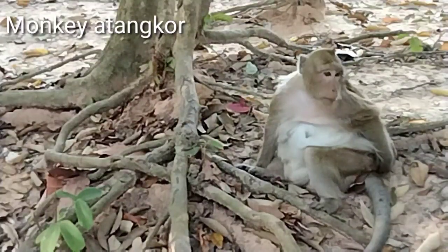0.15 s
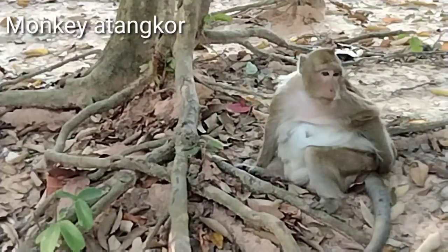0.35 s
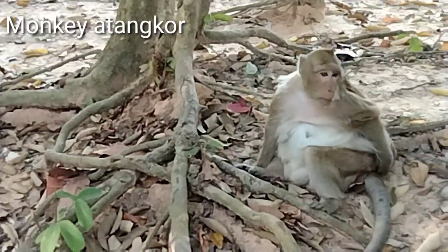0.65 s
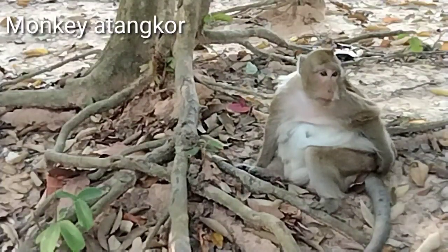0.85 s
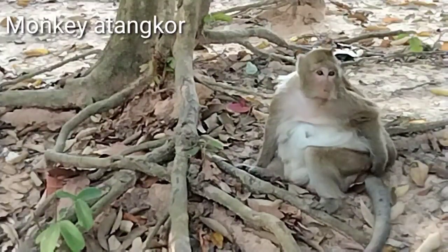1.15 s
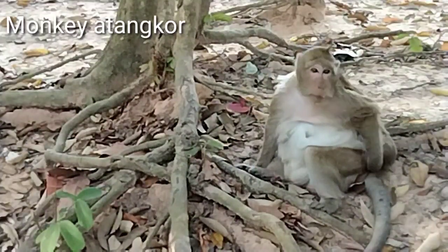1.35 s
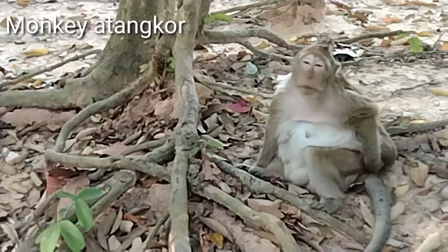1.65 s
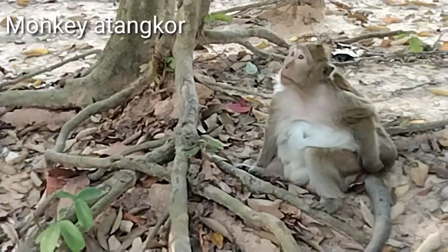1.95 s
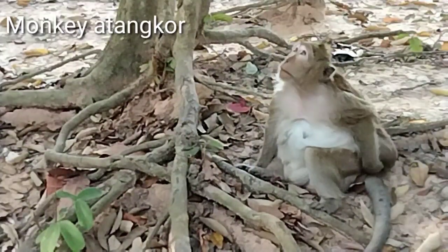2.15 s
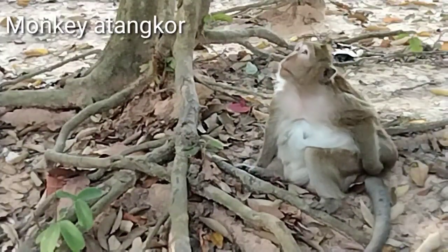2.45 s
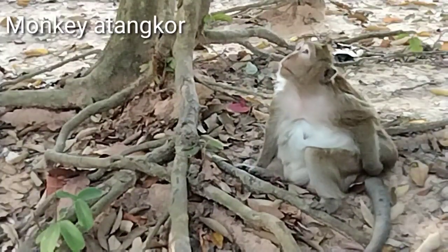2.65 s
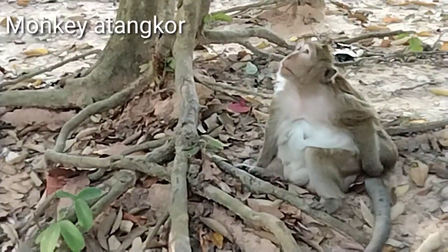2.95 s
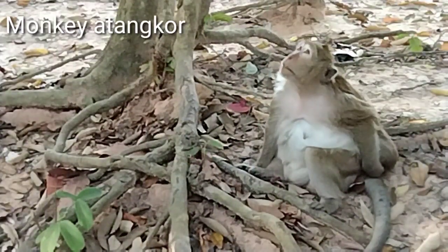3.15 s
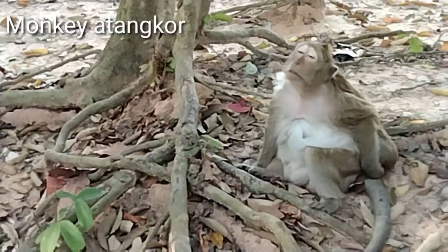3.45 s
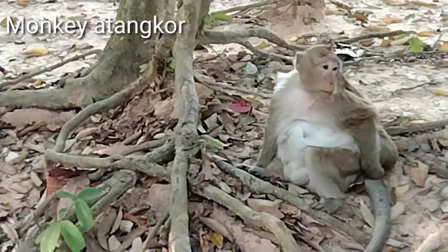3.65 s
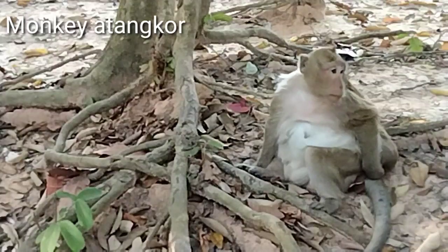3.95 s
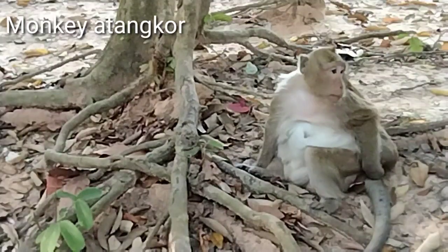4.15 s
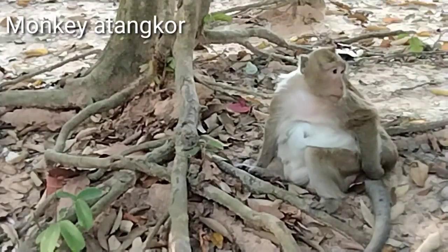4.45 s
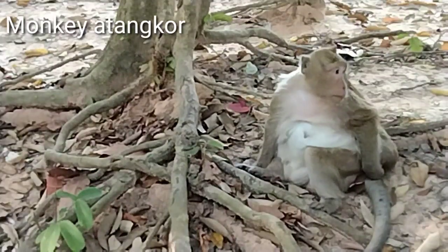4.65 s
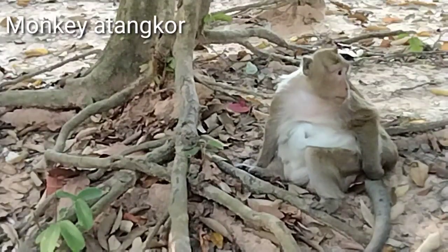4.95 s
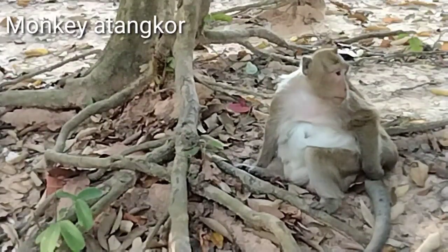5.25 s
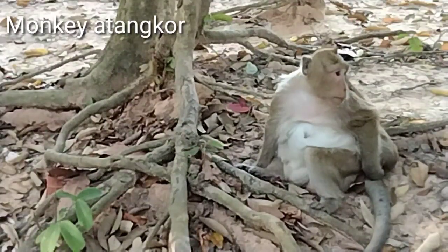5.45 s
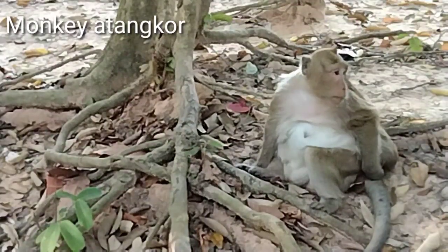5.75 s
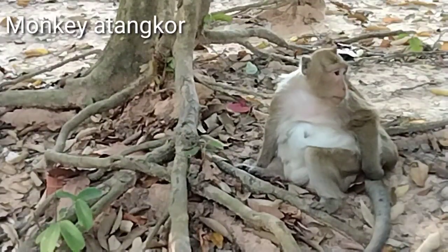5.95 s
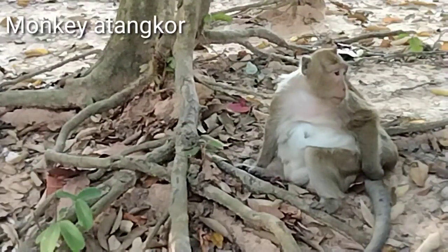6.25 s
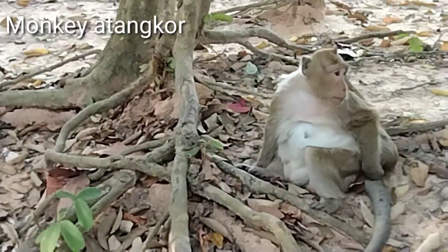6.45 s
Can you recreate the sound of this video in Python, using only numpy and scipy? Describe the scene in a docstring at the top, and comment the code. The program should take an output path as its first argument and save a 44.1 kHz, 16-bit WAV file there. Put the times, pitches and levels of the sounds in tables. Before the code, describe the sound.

A distant engine throbs under a dull rush of air and faint bird whistles, then fingers click, rub and squeak on the microphone.

```python
"""A slow engine throbs far off behind trees, each firing thumping its pipe, over a dull rush of air.
A distant bird gives two rising whistles that linger among the trunks; small dry ticks come and go.
Then, right at the microphone, fingers shift on the camera: tips thud, skin sticks and slips in
rasps and squeaks, and the plastic case clicks and rings. A thin high hiss comes up at the end."""
import sys
import numpy as np
from scipy import signal
from scipy.fft import rfft, irfft, next_fast_len
from scipy.io import wavfile
from scipy.ndimage import uniform_filter1d, map_coordinates

SR = 44100
rng = np.random.default_rng(int(sys.argv[2]) if len(sys.argv) > 2 else 0)


def persist_wave(psi):
    """Save psi, clipped to +-1, as 16-bit WAV."""
    counts = np.round(np.clip(psi, -1, 1) * 32767).astype(np.int16)
    wavfile.write(sys.argv[1], SR, np.atleast_2d(counts).T)


N = 290619


def amp(db):
    """Decibels to gain."""
    return 10 ** (np.asarray(db) / 20)


def unit(x):
    """Scale to rms 1."""
    return x / np.sqrt(np.mean(x ** 2) + 1e-20)


def along(points, hz):
    """Read (frequency, value) points at hz, on a log axis."""
    freqs, values = np.transpose(points)
    return np.interp(np.log(hz + 1), np.log(freqs + 1), values)


def curves(rows):
    """One value per sample for each column after the time."""
    times, *columns = np.transpose(rows)
    return [np.interp(np.arange(N) / SR, times, column) for column in columns]


def wobble(rate):
    """A smooth random curve, rate knots a second."""
    return map_coordinates(rng.standard_normal(int(N * rate / SR) + 4), [np.arange(N) * rate / SR])


def filtered(x, response):
    """Shape x by a gain that depends on frequency."""
    size = next_fast_len(N + SR // 2)
    return irfft(rfft(x, size) * response(np.fft.rfftfreq(size, 1 / SR)), size)[:N]


def noise(spectrum, grain=1):
    """Noise of rms 1 with a given spectrum, optionally broken into grains."""
    return unit(filtered(grain * rng.standard_normal(N), lambda hz: amp(along(spectrum, hz))))


def patchy(x, depth_db):
    """Give x brief random swells in narrow bands, at rms 1."""
    bands = signal.stft(x, nperseg=512)[2]
    swells = uniform_filter1d(rng.standard_normal(bands.shape), size=7, axis=0)
    swells = unit(uniform_filter1d(swells, size=5, axis=1))
    return unit(signal.istft(bands * amp(depth_db * swells), nperseg=512)[1][:N])


def phase_of(hz):
    """Running phase of a changing frequency."""
    return 2 * np.pi * np.cumsum(hz) / SR


def add(track, start, sound):
    """Mix a sound into a track at start seconds."""
    part = track[round(start * SR):][:len(sound)]
    part += sound[:len(part)]


def notes(rows, waver_hz):
    """Short, soft-edged notes, each on one wavering pitch."""
    track = np.zeros(N)
    for start, length, hz, db in rows:
        swell = np.hanning(int(length * SR))
        pitch = hz + waver_hz * wobble(220)[:len(swell)]
        add(track, start, amp(db) * swell * np.sin(phase_of(pitch)))
    return track


# Outdoor air, with a peak from the microphone port: (frequency [Hz], relative density [dB])
AIR_SPECTRUM = [(20, -25), (32, -14), (42, -2), (52, -3.5), (80, 11), (115, 12.5), (170, 13), (300, -6),
                (520, -0.5), (750, -2), (1050, -9.5), (1300, -2), (1540, 5.5), (1720, -2), (1950, -7),
                (2150, -10.5), (2400, -34), (4000, -45.5), (15000, -50)]
# Its strength at the microphone: (time [s], level [dB])
AIR_LEVEL = [(0, -51.5), (1, -52), (2.5, -53), (3.6, -52), (4.5, -51), (5.4, -51), (6.59, -51)]
def air():
    """The air of the wood, all around: a dull steady rush over a low rumble."""
    return amp(curves(AIR_LEVEL)[0]) * patchy(noise(AIR_SPECTRUM), depth_db=0.96)


# Colour of the hiss: (frequency [Hz], relative density [dB])
HISS_SPECTRUM = [(2300, 1), (2650, -12), (3100, 2), (3900, -24), (5000, -27.5), (6100, -18), (6900, 4),
                 (7400, 5), (8000, 1.5), (8700, -3), (10100, -19), (12000, -12), (15500, -12)]
# Its late rise: (time [s], level [dB])
HISS_LEVEL = [(5.6, -105), (5.85, -72), (6.02, -67.5), (6.25, -65.5), (6.59, -64.5)]
def hiss():
    """A thin, flickering hiss comes up in the background."""
    return amp(curves(HISS_LEVEL)[0]) * patchy(noise(HISS_SPECTRUM), depth_db=4.5)


# Shrill bands: (centre [Hz], width [Hz], relative level [dB])
INSECT_BANDS = [(3090, 240, -3), (7360, 430, -1.5)]
# Their shared swell: (time [s], level [dB])
INSECT_LEVEL = [(5.0, -130), (5.4, -77.5), (5.65, -82.5), (5.85, -73), (6.59, -76)]
def insects():
    """Two narrow, insect-like bands of noise come up just ahead of the hiss."""
    shrill = np.zeros(N)
    for centre, width, db in INSECT_BANDS:
        band = filtered(rng.standard_normal(N), lambda hz: 1 / (1 + ((hz - centre) / width) ** 2) ** 3)
        shrill += amp(db) * unit(band)
    return amp(curves(INSECT_LEVEL)[0]) * shrill


# Engine speed: (time [s], firing rate [Hz])
FIRING_RATE = [(0, 28.65), (.6, 28.7), (1.5, 28.6), (2.3, 28.4), (2.8, 28.55), (3.1, 29.1), (3.9, 29.1),
               (4.6, 28.95), (5.2, 29.1), (6, 28.85), (6.59, 28.45)]
# The droning fifth exhaust harmonic: (time [s], level [dB])
DRONE_LEVEL = [(0.0, -45.5), (0.38, -48), (1.01, -60), (1.19, -73), (1.25, -54), (1.71, -49), (2.02, -56),
               (5.69, -59.5), (6.31, -50), (6.59, -55)]
# The booming sixth: (time [s], level [dB])
BOOM_LEVEL = [(0.0, -43), (0.07, -46.5), (0.27, -52.5), (0.37, -42), (0.44, -48), (0.66, -41),
              (1.05, -45.5), (1.35, -52), (1.72, -59.5), (1.91, -44.5), (2.15, -57.5), (2.37, -46),
              (2.5, -61.5), (2.66, -44.5), (2.83, -53), (2.99, -46.5), (3.12, -64.5), (3.25, -48),
              (3.38, -57), (5.05, -55.5), (5.17, -61.5), (5.51, -50.5), (5.58, -60), (6.59, -52.5)]
# The other harmonics: (multiple of the firing rate, start level [dB], end level [dB])
EXHAUST_HARMONICS = [(3, -69.5, -64), (4, -64, -61), (7, -56, -63.5), (8, -62.5, -68), (9, -62, -70),
                     (10, -68.5, -72.5), (11, -68.5, -72), (12, -66, -76.5), (13, -66.5, -78.5),
                     (14, -72, -80.5)]
# The roar, dull with distance: (frequency [Hz], relative density [dB])
ROAR_SPECTRUM = [(50, -40.5), (95, -12), (135, 0), (175, 2), (215, -1), (265, 1), (310, -4.5), (430, -13),
                 (700, -19), (950, -10.5), (1200, -15), (1600, -57), (2600, -110)]
# How much of the roar gets through the trees: (time [s], relative level [dB])
ROAR_TREND = [(0, -45.5), (.4, -48), (.85, -49), (1.4, -49.5), (2.6, -51.5), (3.7, -54), (6.59, -57)]
def engine(first_firing_s=0.017, pipe_hz=160, pipe_width_hz=50, drone_db=-0.5, roar_db=-56,
           throb=0.27, fading_db=3.0, scatter_rad=0.72, uneven_db=0.94):
    """Far off, each firing thumps the pipe and swells the roar; harmonics waver through the trees."""
    rate, = curves(FIRING_RATE)
    firing_phase = phase_of(rate) - 2 * np.pi * rate[0] * first_firing_s
    harmonics = [(5, curves(DRONE_LEVEL)[0] + drone_db), (6, curves(BOOM_LEVEL)[0])]
    for k, start_db, end_db in EXHAUST_HARMONICS:
        harmonics.append((k, np.linspace(start_db, end_db, N) + fading_db * wobble(2.2)))
    thumps = np.zeros(N)
    for k, db in harmonics:
        pipe_lag = np.arctan(2 * (k * rate - pipe_hz) / pipe_width_hz)
        thumps += amp(db) * unit(np.cos(k * firing_phase - pipe_lag + scatter_rad * wobble(2.7)))
    roar = unit(noise(ROAR_SPECTRUM) * np.exp(throb * np.cos(firing_phase - np.pi / 3)))
    thumps *= amp(uneven_db * wobble(28))  # no two firings are quite equal
    trend_db, = curves(ROAR_TREND)
    return thumps + amp(roar_db + trend_db - trend_db.mean()) * roar


# How long the wood rings: (frequency [Hz], t60 [s])
FOREST_DECAY = [(500, .55), (3000, .33), (5300, .55), (7000, .33), (14000, .3)]
def forest(x, build_s=0.0039):
    """Trunks and leaves scatter a sound into a smooth tail that builds up as more of them answer."""
    hz, t, bands = signal.stft(rng.standard_normal(SR), SR, nperseg=256)
    envelope = amp(-60 * t / along(FOREST_DECAY, hz)[:, None]) * (1 - np.exp(-t / build_s))
    tail = signal.istft(bands * envelope, SR, nperseg=256)[1]
    return signal.fftconvolve(x, tail / np.linalg.norm(tail))[:N]


# Faint calls: (time [s], length [s], pitch [Hz], level [dB])
PEEPS = [(0.042, 0.058, 2780, -82.5), (0.622, 0.082, 5340, -85), (2.096, 0.068, 3900, -87),
         (2.3, 0.023, 3980, -68), (3.055, 0.045, 3830, -85), (5.55, 0.17, 5400, -81)]
def far_birds():
    """Birds deep in the wood peep, each call on one pitch."""
    return notes(PEEPS, waver_hz=35)


# Ticks and scrapes: (time [s], peak [dB], pitch [Hz], t60 [s], crack against ring [dB])
DRY_TICKS = [(2.179, -63.5, 3160, .014, -9), (2.46, -56, 2370, 0.024, -29), (3.1838, -40, 1600, 0.006, -45),
             (3.203, -30.5, 1550, 0.0042, -11.5), (3.846, -35, 1550, 0.0052, -6),
             (3.948, -51, 3980, 0.025, -8), (3.984, -54.5, 3760, .02, -3), (4.019, -51, 3980, .05, -3),
             (5.529, -54, 4370, 0.0063, -14), (5.833, -35.5, 1850, 0.022, -32.5)]
def dry_ticks(attack_s=0.00067, crack_hz=4400):
    """Small dry ticks and soft scrapes, each a brief ring under a tiny crack."""
    track, t = np.zeros(N), np.arange(SR // 20) / SR
    crack_band = signal.butter(6, [crack_hz / 2, crack_hz], "band", fs=SR)
    for start, db, hz, t60, crack_db in DRY_TICKS:
        crack = unit(signal.lfilter(*crack_band, rng.standard_normal(len(t))))
        envelope = amp(-60 * t / t60) * (1 - np.exp(-t / attack_s)) ** 2
        tick = envelope * (np.sin(2 * np.pi * hz * t) + amp(crack_db) * crack)
        add(track, start, amp(db) * tick / np.abs(tick).max())
    return track


# Rising whistles: (time [s], length [s], level [dB], starting pitch [Hz])
WHISTLES = [(2.333, 0.12, -60.5, 4240), (3.335, .155, -63, 4180)]
def whistling_bird(top_hz=6600, waver_hz=90, edge_s=0.0028, peak_at=0.38, onset_db=-20, ending_db=-12):
    """A distant bird whistles in trembling upward glides, each loudest a little before its middle."""
    song = np.zeros(N)
    for start, length, db, from_hz in WHISTLES:
        progress = np.linspace(0, 1, int(length * SR))
        hz = from_hz * (top_hz / from_hz) ** progress + waver_hz * wobble(220)[:len(progress)]
        rise_db = onset_db * (1 - progress / peak_at) ** 2
        fall_db = ending_db * ((progress - peak_at) / (1 - peak_at)) ** 2
        arch_db = np.where(progress < peak_at, rise_db, fall_db)
        edges = np.minimum(np.minimum(progress, 1 - progress) * length / edge_s, 1)
        add(song, start, edges * amp(db + arch_db) * np.sin(phase_of(hz)))
    return song


# Crackle of the resting hand: (frequency [Hz], relative density [dB])
CREEP_SPECTRUM = [(300, -12.5), (1500, 1.5), (2300, 11), (3000, -1.5), (4100, -1.5), (5500, -8.5),
                  (7500, -2.5), (10000, -15.5), (15500, -19.5)]
# Its strength at the microphone: (time [s], level [dB])
GRIP_LEVEL = [(3.845, -115), (3.855, -69), (3.93, -72.5), (4.02, -68.5), (4.1, -67.5), (4.4, -64),
              (5.0, -59.5), (5.27, -62.5), (5.38, -66), (5.55, -100)]
def grip(uneven_db=4):
    """Beside the microphone, the resting hand creeps on the case with a faint, fine crackle."""
    grain = amp(uneven_db * np.minimum(wobble(240), 2.5))
    return amp(curves(GRIP_LEVEL)[0]) * noise(CREEP_SPECTRUM, grain)


# Fingertip landings: (time [s], relative peak [dB])
THUDS = [(4.077, -40), (4.101, -31.5), (4.2155, -38), (4.361, -42.5), (4.4096, -35), (4.5876, -32.5),
         (4.925, -30.5), (5.0415, -39.5), (5.832, -40)]
def thuds(push_s=0.00064, gain_db=7, low_cut_hz=100):
    """A fingertip lands by the microphone: one soft push of pressure, no ring, little deep bass."""
    track, u = np.zeros(N), np.arange(SR // 30) / SR / push_s
    pulse = u * (1 - u / 2) * np.exp(-u)
    for start, db in THUDS:
        add(track, start, amp(db + gain_db) * pulse / pulse.max())
    return signal.lfilter(*signal.butter(2, low_cut_hz, "high", fs=SR), track)


# Clean squeaks: (time [s], length [s], pitch [Hz], level [dB])
SQUEAKS = [(4.236, 0.03, 11300, -49), (4.322, 0.033, 7300, -49), (4.425, 0.032, 11100, -44),
           (4.537, 0.02, 7150, -44.5), (4.644, .01, 6560, -39), (4.684, 0.019, 5200, -46),
           (4.738, 0.033, 5400, -45), (4.843, 0.019, 6000, -34)]
def squeaks():
    """Close up, a finger squeaks briefly as it catches or lets go."""
    return notes(SQUEAKS, waver_hz=70)


def chatter(pitch, spread_hz, slips_per_s=800, t60=0.017, uneven_db=3.0):
    """Stick and slip: an uneven train of tiny pings, each with its own size and pitch; rms 1 in all."""
    count = int(slips_per_s * N / SR)
    jitter, detune, size = rng.standard_normal((count, 3)).T
    onsets = np.clip((np.arange(count) + jitter / 2) * SR / slips_per_s, 0, N - 1).astype(int)
    hz = pitch[onsets] + spread_hz[onsets] * np.clip(detune, -1.5, 1.5)
    n = np.arange(SR // 60)
    envelopes = amp(uneven_db * np.minimum(size[:, None], 2) - 60 * n / SR / t60)
    pings = envelopes * np.sin(2 * np.pi * hz[:, None] * n / SR)
    return unit(np.bincount((onsets[:, None] + n).ravel(), pings.ravel(), N)[:N])


def stroke_envelope(start, length, start_db, end_db, rise_db_per_s=1252, fall_db_per_s=897):
    """Level of one finger stroke in dB: a quick rise, a ramp while it slides, a quick fall."""
    t = np.arange(N) / SR - start
    ramp_db = np.interp(t, [0, length], [start_db, end_db])
    return ramp_db + rise_db_per_s * np.minimum(t, 0) - fall_db_per_s * np.maximum(t - length, 0)


# Finger strokes: (time [s], length [s], start level [dB], end level [dB],
# squeak start [Hz], squeak end [Hz], squeak spread [Hz], relative body level [dB])
STROKES = [(4.066, 0.082, -55.5, -57, 8350, 9400, 1500, -8),
           (4.234, 0.017, -52.5, -50, 8300, 8200, 1180, 0.5),
           (4.265, 0.055, -33, -39.5, 7240, 7700, 520, -8.5),
           (4.431, 0.072, -37.5, -46, 7090, 6930, 399, -11.5),
           (4.547, 0.054, -49, -47, 6580, 6200, 299, -5), (4.622, 0.038, -48, -49.5, 6300, 6800, 393, 0.5),
           (4.684, 0.016, -36.5, -38, 6650, 6140, 700, -12),
           (4.713, 0.027, -40.5, -32, 6600, 6200, 450, -12.5),
           (4.862, 0.036, -35, -25.5, 6960, 5870, 1050, -13),
           (5.017, 0.0097, -62, -57, 4240, 4200, 697, -6), (5.223, 0.0046, -44, -48, 7100, 6970, 248, -3)]
# Skin rasping on plastic: (frequency [Hz], relative density [dB])
RASP_SPECTRUM = [(200, -16), (450, -6), (900, -8.5), (1200, -11), (1550, -3.5), (2000, 1), (2600, -17),
                 (3200, -10), (4000, 0.5), (4900, -13.5), (6500, -1.5), (7700, 0.5), (9300, -17),
                 (11400, -7.5), (15500, -8.5)]
# The hollow body of the case: (frequency [Hz], relative density [dB])
BODY_SPECTRUM = [(700, -34), (1200, -6), (1530, 4.5), (1950, -13), (2600, -31.5), (5000, -57.5)]
def rubbing(rasp_db=-4, squeak_db=-1, octave_db=-13, grain_db=2.5, crackle_db=-58, slip_db=9):
    """Skin drags by the microphone in fine slips: a grainy rasp, a hollow body, a gliding squeak."""
    knots, envelopes = [], []
    for start, length, start_db, end_db, from_hz, to_hz, *timbre in STROKES:
        knots += [(start, from_hz, *timbre), (start + length, to_hz, *timbre)]
        envelopes.append(stroke_envelope(start, length, start_db, end_db))
    pitch, spread_hz, body_db = curves(sorted(knots))
    stroke_db = np.max(envelopes, axis=0)
    grain = amp(grain_db * np.minimum(wobble(900), 2))
    rasp = patchy(noise(RASP_SPECTRUM, grain), depth_db=3.0)
    squeak = chatter(pitch, spread_hz) + amp(octave_db) * chatter(2 * pitch, 2 * spread_hz)
    body = noise(BODY_SPECTRUM, grain)
    sliding = amp(rasp_db) * rasp + amp(squeak_db) * squeak + amp(body_db) * body
    # while the fingers press, the contact also gives way in sparse little ticks
    pressing = np.clip((stroke_db + 58.5) / 14, 0, 1)
    ticks = noise(RASP_SPECTRUM, grain=amp(slip_db * np.minimum(wobble(510), 2.5)))
    return amp(stroke_db) * sliding + amp(crackle_db) * pressing * ticks


# Clicks of the case: (time [s], ring level [dB], ring pitch [Hz], upper-mode gain [dB],
# slip level [dB], slip length [s])
CLICKS = [(3.8513, -33, 1550, 0, -50.5, 0.0011), (4.1021, -3.5, 1480, 4, -16.5, 0.0016),
          (4.215, -48, 1500, 2, -50, 0.0014), (4.2573, -34, 1470, -8, -32, 0.0055),
          (4.36, -40, 1500, 4.5, -63, 0.0032), (4.412, -37, 1490, -4, -39, 0.00061),
          (4.477, -50, 1490, -7, -56, 0.0014), (4.5465, -38, 1500, -2, -44.5, .0015),
          (4.587, -38, 1490, -2, -32.5, 0.00042), (4.6206, -18.5, 1630, 9, -18, 0.005),
          (4.6492, -28, 1500, -4, -43, 0.0018), (4.6691, -18.5, 1560, -8, -28, .0042),
          (4.7254, -31, 1470, -8.5, -28, 0.0026), (4.7408, -27, 1450, -13.5, -42, 0.0019),
          (4.748, -21.5, 1610, -10, -36, .0011), (4.8296, -32.5, 1550, -11, -50, 0.0011),
          (4.8558, -47, 1500, 3.5, -38, 0.0016), (4.8674, -42, 1510, -4, -32, .0015),
          (4.924, -30, 1470, -4, -45, 0.0019), (4.953, -29, 1500, -10, -46, 0.0012),
          (5.041, -22.5, 1490, 0, -27.5, 0.0021), (5.0718, -27.5, 1430, -13, -41, 0.00315),
          (5.082, -31, 1910, -14, -51, 0.0022), (5.1082, -46, 1500, -2, -46, 0.00093),
          (5.15, -36, 1400, -8, -48, 0.00088), (5.1627, -36, 1450, -5, -61, 0.00093),
          (5.1996, -34, 1230, -8, -53, .00093), (5.2262, -35, 1620, -11, -43, 0.0023),
          (5.2674, -29, 1530, -20, -43.5, 0.001), (5.337, -48.5, 1492, -6, -50.5, 0.0012),
          (5.832, -33, 1400, -24, -51, 0.00077)]
# Modes of the case, lowest first: (frequency [Hz], relative level [dB], t60 [s])
CASE_MODES = [(1517, -1.5, 0.014), (1674, -2, .011), (1890, -8, 0.0096), (2810, -4.5, 0.0063),
              (3180, -9, 0.0048), (4310, -13, 0.0053), (5170, -18, .009), (6600, -16.5, .008),
              (7000, -22.5, .013)]
# Colour of the slipping plastic: (frequency [Hz], relative density [dB])
SLIP_SPECTRUM = [(300, -17), (1000, -13.5), (1600, 8.5), (2500, -8.5), (3200, 2.5), (4600, 1), (5700, -9.5),
                 (7300, 5), (8800, -14.5), (12000, -6.5), (15500, -8)]
def clicks(attack_s=0.00063, tail_db=-15, tail_t60=0.047, detune=0.026, upper_hz=2300, low_cut_hz=750):
    """Right at the microphone the case slips, then rings; its tone depends on where it is pressed."""
    track, t = np.zeros(N), np.arange(SR // 10) / SR
    slips = noise(SLIP_SPECTRUM)
    low_cut = signal.butter(2, low_cut_hz, "high", fs=SR)  # the ring carries little below about 750 Hz
    for start, ring_db, pitch_hz, upper_db, slip_db, slip_s in CLICKS:
        ring = np.zeros(len(t))
        for hz, db, t60 in CASE_MODES:
            if hz > upper_hz:  # each click sets how loud these upper modes ring, and detunes them a little
                hz *= 1 + rng.normal(0, detune)
                db += upper_db + rng.normal(0, 1.2)
            else:
                hz *= pitch_hz / CASE_MODES[0][0]
            ring += amp(db - 60 * t / t60) * np.sin(2 * np.pi * hz * t)
        ring = signal.lfilter(*low_cut, ring * (1 - np.exp(-t / attack_s)))
        burst = np.maximum(np.exp(-(t / slip_s) ** 4), amp(tail_db - 60 * (t - slip_s) / tail_t60))
        add(track, start, amp(slip_db) * burst * slips[round(start * SR):][:len(t)])
        add(track, start + 0.58 * slip_s, amp(ring_db) * ring)  # rings from partway through the slip
    return track


def scene(song_direct_db=-9, tick_echo_db=-11, peep_echo_db=-8):
    """One microphone in a wood: the far whistles are mostly echo, the touches on the case are dry."""
    song, peeps, ticks = whistling_bird(), far_birds(), dry_ticks()
    direct = amp(song_direct_db) * song + peeps + ticks
    echo = forest(song + amp(peep_echo_db) * peeps + amp(tick_echo_db) * ticks)
    background = engine() + air() + hiss() + insects()
    handling = clicks() + thuds() + rubbing() + squeaks() + grip()
    return (background + direct + echo + handling)[None]


def record(dry, fade_s=0.004, low_cut_hz=35, top_hz=15800):
    """The sound fades in over a few milliseconds; the camera drops the deepest bass and keeps nothing above its
    band limit."""
    fade_in = np.minimum(np.arange(N) / (fade_s * SR), 1)
    lean = signal.lfilter(*signal.butter(2, low_cut_hz, "high", fs=SR), dry[0] * fade_in)
    return filtered(lean, lambda hz: 1 / (1 + (hz / top_hz) ** 200))[None]


dry = scene()
out = record(dry)
persist_wave(out)
```